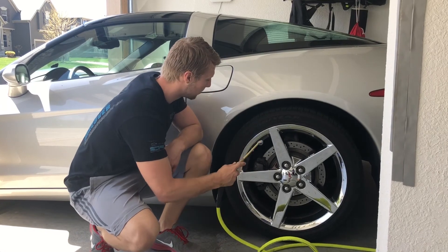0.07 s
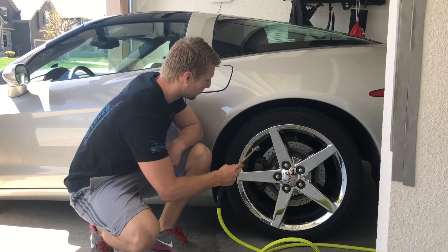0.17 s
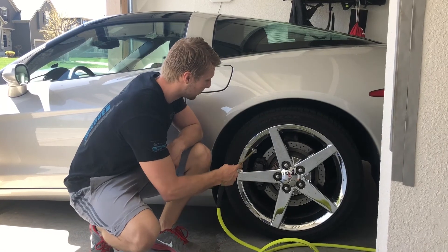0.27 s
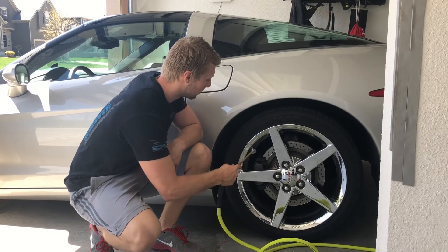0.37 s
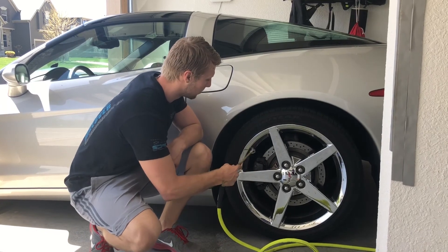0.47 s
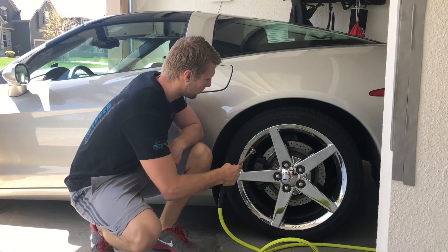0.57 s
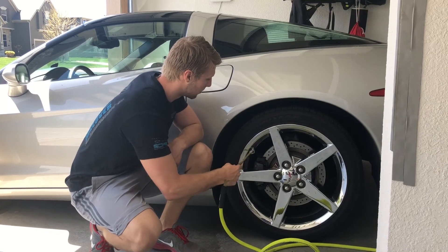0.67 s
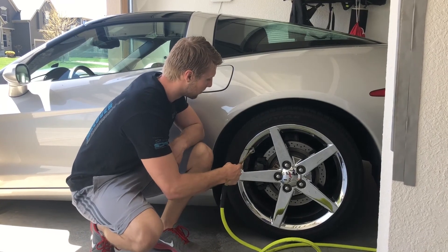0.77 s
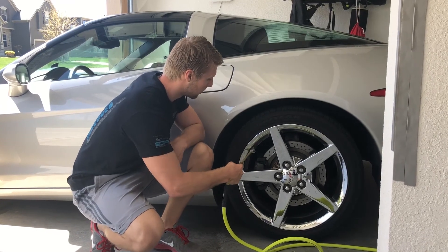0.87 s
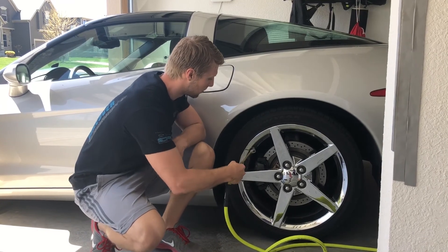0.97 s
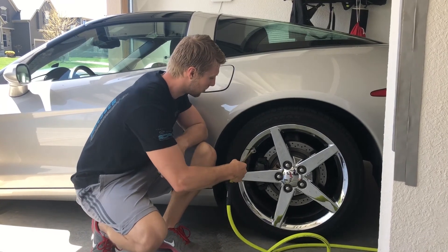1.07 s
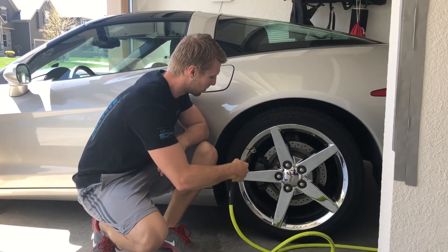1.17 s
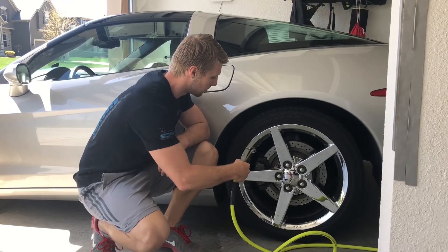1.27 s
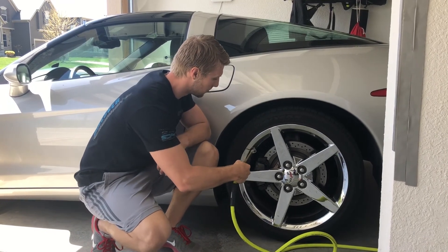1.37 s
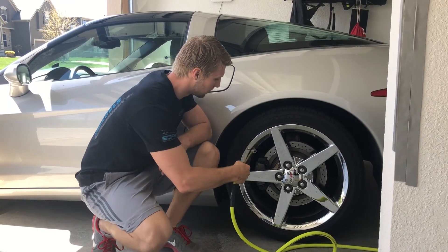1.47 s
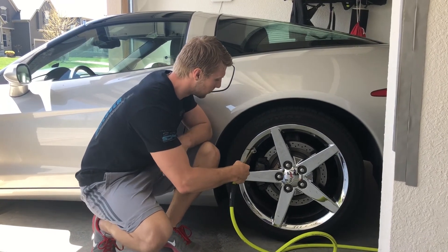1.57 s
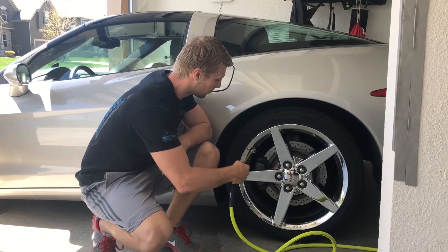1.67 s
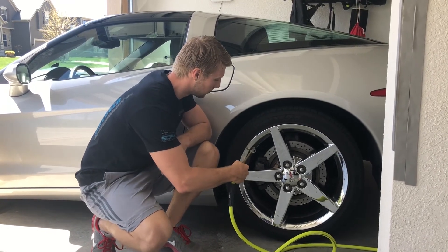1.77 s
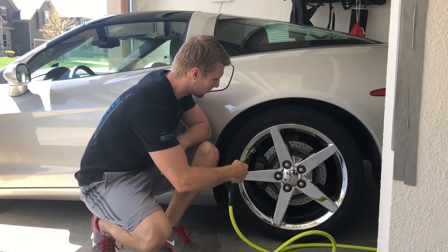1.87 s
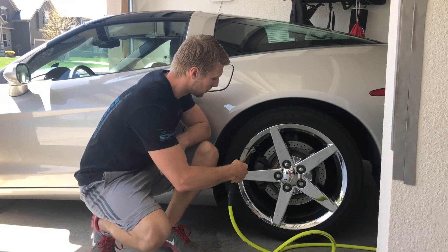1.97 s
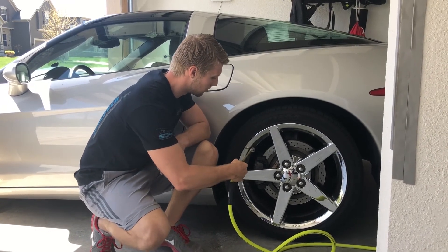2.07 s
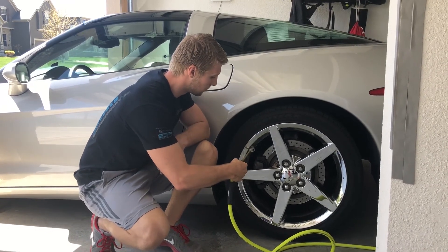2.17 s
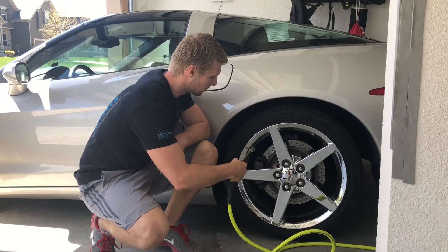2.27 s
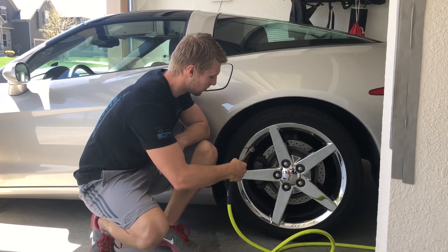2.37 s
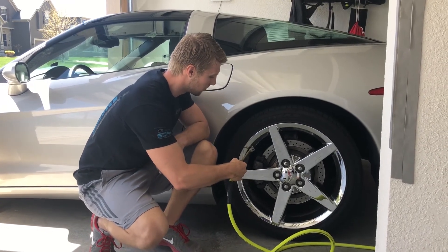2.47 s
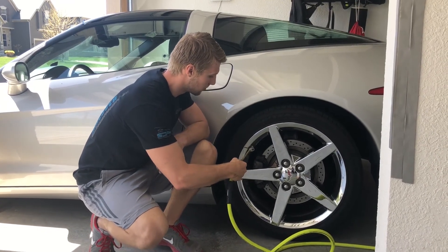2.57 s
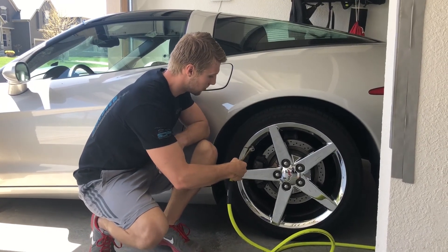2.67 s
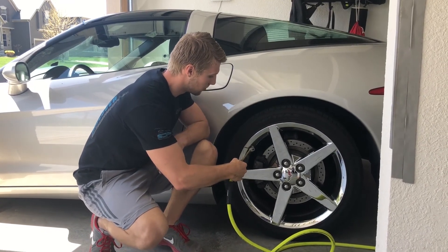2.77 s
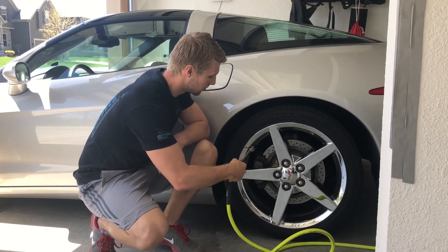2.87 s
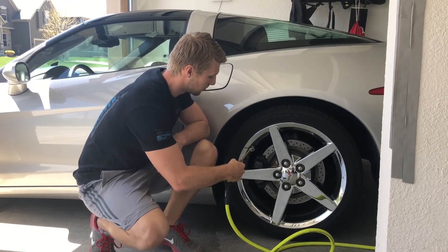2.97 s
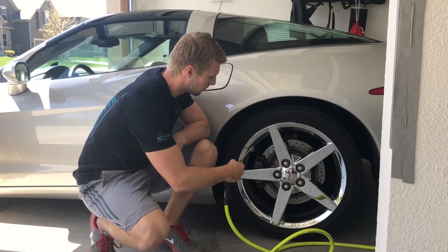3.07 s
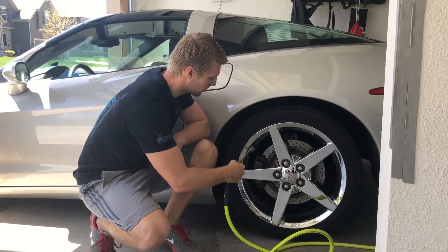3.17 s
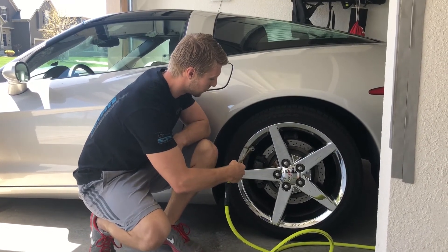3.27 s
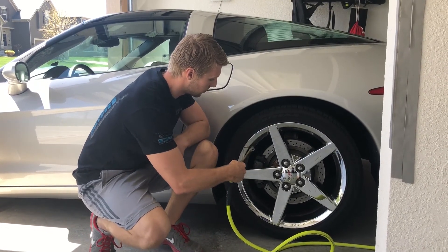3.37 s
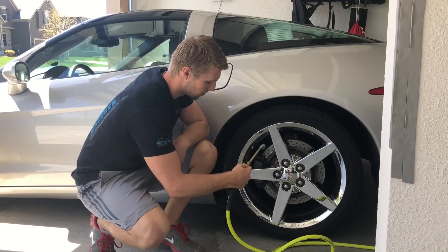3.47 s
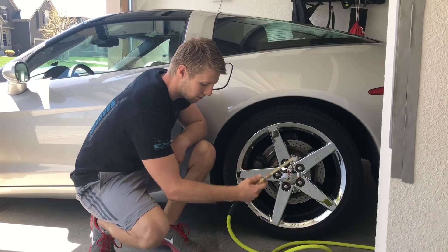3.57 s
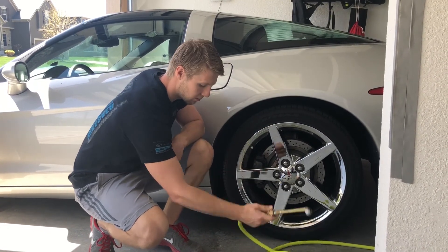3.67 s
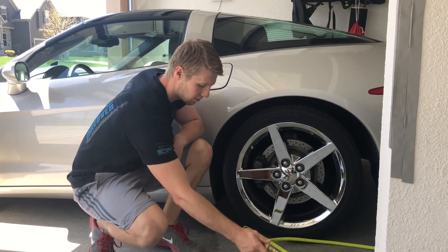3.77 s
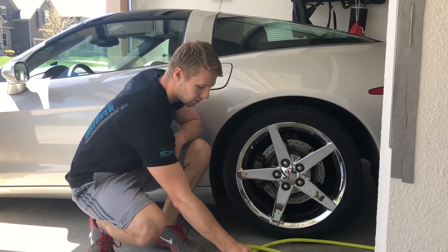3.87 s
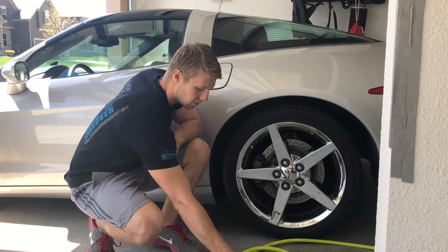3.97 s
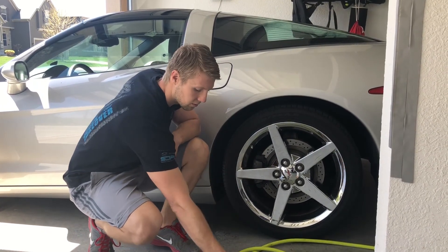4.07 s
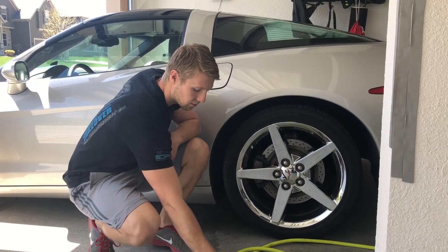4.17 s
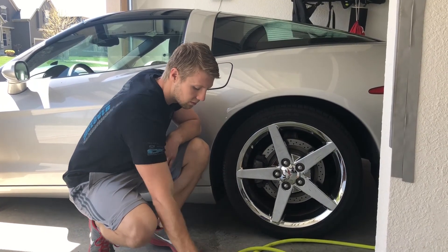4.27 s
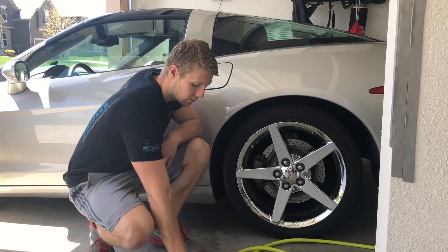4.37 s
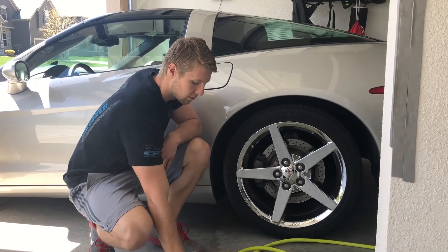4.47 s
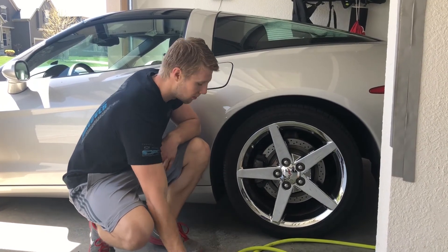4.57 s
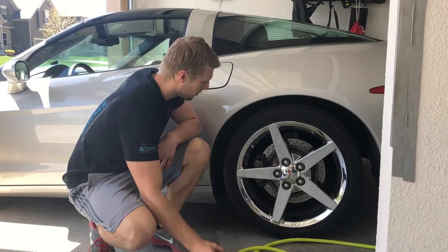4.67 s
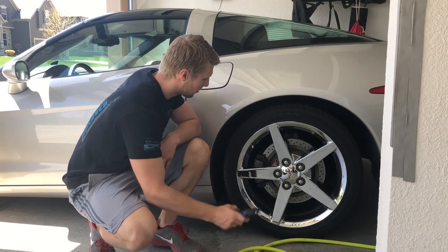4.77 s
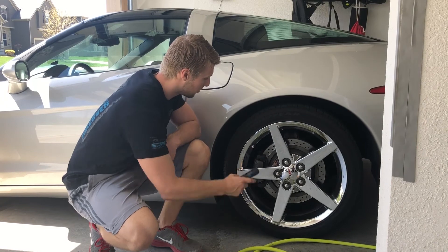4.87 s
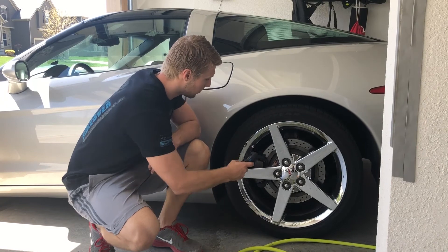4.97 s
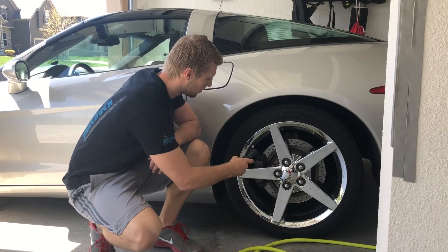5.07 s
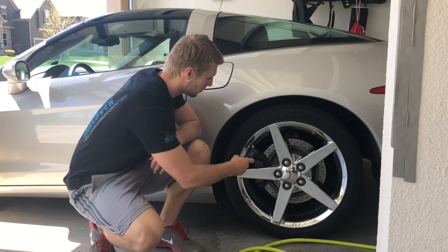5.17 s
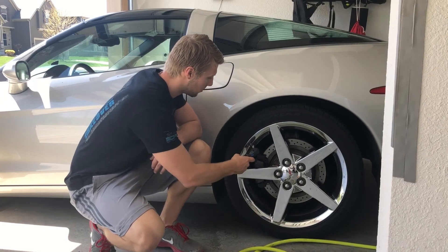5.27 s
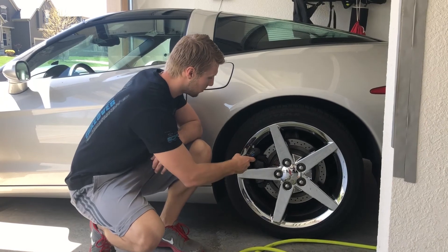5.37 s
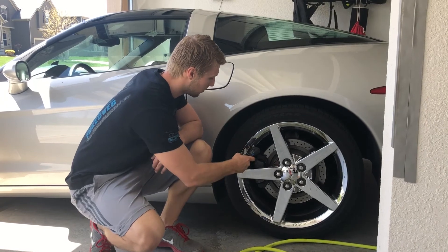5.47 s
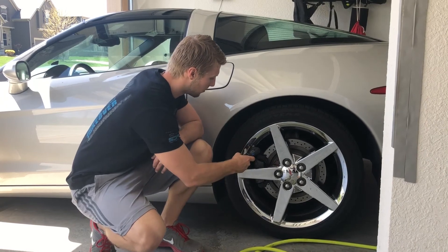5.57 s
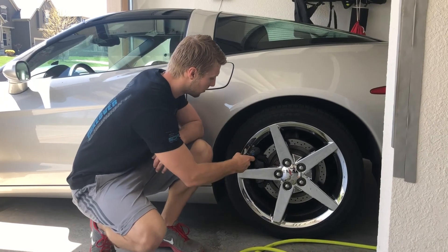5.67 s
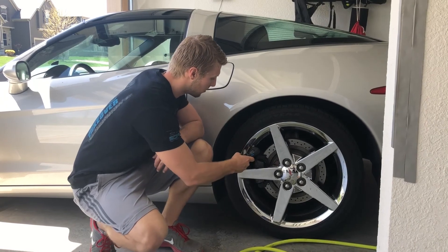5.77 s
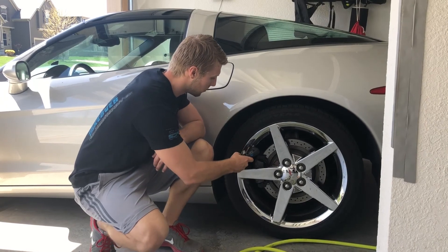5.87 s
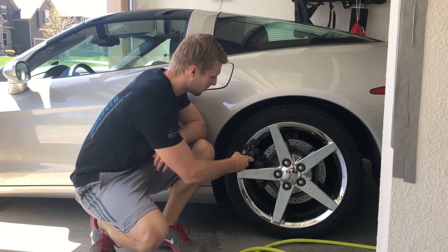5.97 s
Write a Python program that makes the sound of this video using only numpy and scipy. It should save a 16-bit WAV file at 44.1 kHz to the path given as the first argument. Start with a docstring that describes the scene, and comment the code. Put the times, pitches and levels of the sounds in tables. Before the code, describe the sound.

A quiet open garage with low mains hum, soft fan drone and outdoor air, heard in mono from a few steps away. After a faint scuff, a chuck knocks sharply on a tyre valve at 0.3 s, with weaker taps to 0.9 s; some give tiny falling chirps and lingering wheel ring. At 0.94 s a very short, loud double spit of air rings inside the tyre. A thin, bright, slightly singing hiss opens by 1.4 s, settles and wavers until 3.0 s, with light cloth rubs and a faint squeak near 2.1 s. Faint insect buzz swells around 3.2-3.8 s. A brief hiss at 3.3 s precedes a strong spurt at 3.42 s. Light floor contacts at 4.0 s lead to a hard, rebounding metal clack on concrete at 4.25 s. Plastic gauge clicks come at 4.5-4.9 s, then small clicks and a rub near 5.55 s and a weak puff at 5.76 s.

```python
"""An air chuck tops up a car tyre in an open garage: it taps onto the valve, spits as it seats, hisses thinly while
air flows and spits again as it comes off. It is dropped on the concrete; a gauge is picked up and pressed on.
Hits are coloured noise bursts and air is shaped noise; blows on the valve add falling chirps and wheel ringing.
Soles and cloth rub, with a faint squeak, a mains hum, a fan and one burst of insects under the garage's echo."""
import sys
import numpy as np
from scipy import signal
from scipy.fft import rfft, irfft
from scipy.io import wavfile

SR = 44100
rng = np.random.default_rng(int(sys.argv[2]) if len(sys.argv) > 2 else 0)


def persist_wave(psi):
    """Save psi, clipped to +-1, as 16-bit WAV."""
    counts = np.round(np.clip(psi, -1, 1) * 32767).astype(np.int16)
    wavfile.write(sys.argv[1], SR, np.atleast_2d(counts).T)


N = 265570
TIME = np.arange(N) / SR
FREQS = np.fft.rfftfreq(8192, 1 / SR) + 1  # the 1 Hz offset keeps logs and divisions finite

# Chuck against the valve. Each row: start in seconds, click level in dB, brightness in dB per octave,
# wheel chirp level in dB.
VALVE_TAPS = [(0.2931, -29, -1.73, -37.5), (0.4103, -55, 12.5, -38), (0.574, -45, -5.5, -50),
              (0.713, -63, 0.5, -57), (0.7967, -42, -1, -56.5), (0.918, -56, 5, -51), (0.934, -64, -5, -43),
              (1.225, -55.5, 5.5, -83)]


def undb(db):
    """Decibels to gain."""
    return 10 ** (np.asarray(db) / 20)


def unit(x):
    """Scale to rms 1."""
    return x / np.sqrt(np.mean(x ** 2))


def noise():
    """White noise over the whole scene."""
    return rng.standard_normal(N)


def walk(rate):
    """Slow random drift with a spread near 1, through 'rate' random points a second."""
    knots = rng.standard_normal(4000)
    return np.interp(TIME * rate, np.arange(len(knots)), knots)


def colour(points, tilt_db=0):
    """Gain over frequency from (Hz, dB) points, tilted per octave."""
    hz, db = np.transpose(points)
    level_db = np.interp(np.log(FREQS), np.log(hz), db)
    return undb(level_db + tilt_db * np.log2(FREQS))


def resonances(modes):
    """Gain over frequency of a set of (Hz, width in Hz, dB) peaks, summed in power."""
    power = 0
    for hz, width, db in modes:
        detuning = (FREQS - hz ** 2 / FREQS) / width
        power = power + undb(db) ** 2 / (1 + detuning ** 2)
    return np.sqrt(power)


def through(x, response):
    """Convolve, keeping the length."""
    return signal.fftconvolve(x, response)[:len(x)]


def shape(x, gain):
    """Causal minimum-phase filter with the given relative gain curve; white noise keeps its power."""
    cepstrum = irfft(np.log(gain / gain.max() + 1e-5))
    half = len(cepstrum) // 2
    folded = np.r_[cepstrum[0], 2 * cepstrum[1:half]]
    response = irfft(np.exp(rfft(folded, 2 * half)))
    return through(x, response / np.linalg.norm(response))


def add(track, s, sound):
    """Mix a sound in from time s."""
    i = max(int(s * SR), 0)
    track[i:i + len(sound)] += sound[:N - i]


def swell(s, rise, hold, fall):
    """An envelope that opens up to time s, holds, and dies away; rise and fall are time constants."""
    opening = np.minimum(TIME - s, 0) / rise
    closing = np.maximum(TIME - s - hold, 0) / fall
    return np.exp(opening - closing)


def tail(t60, build):
    """A second of dense echoes that build up and decay; energy 1."""
    t = TIME[:SR]
    echoes = rng.standard_normal(SR) * undb(-60 * t / t60) * (1 - np.exp(-t / build))
    return echoes / np.linalg.norm(echoes)


def clicks(rows, body, chatter_s, wet_db):
    """Hard contacts: a few milliseconds of chatter and its echo, coloured by the struck body."""
    out, t = np.zeros(N), TIME[:SR]
    for s, db, tilt_db, *_ in rows:
        chatter = rng.standard_normal(SR) * np.exp(-t / chatter_s)
        echo = undb(wet_db) * np.linalg.norm(chatter) * garage_tail()
        add(out, s, undb(db) * shape(chatter + echo, colour(body, tilt_db)))
    return out


def flow(waver_db=-2.4, open_s=0.08, close_s=.06, surge_db=4, surge_s=0.46):
    """Air stream: the valve opens gradually, stored hose pressure surges, settles, wavers and is shut off."""
    # Shots of air into the tyre. Each row: fully open time in seconds, length in seconds,
    # settled level in dB ahead of the jet and ring mix.
    shots = [(1.388, 1.637, -61.5), (3.288, 0.05, -66)]
    strength = 0
    for s, length, db in shots:
        surge = surge_db * np.exp(-np.maximum(TIME - s, 0) / surge_s)
        strength = strength + undb(db + surge) * swell(s, open_s, length, close_s)
    return strength * undb(waver_db * walk(12))


def tube():
    """Gain over frequency of the chuck's straight stem, a pipe with evenly spaced resonances."""
    spacing_hz, reflection = 700, .42
    return 1 / np.abs(1 - reflection * np.exp(2j * np.pi * FREQS / spacing_hz))


def filling(ring_db=-7, jet_db=-2):
    """The steady jet in the valve is combed by the stem and sings in the narrow metal bores."""
    # Spectrum of the jet. Each row: frequency in Hz, relative level in dB.
    jet_spectrum = [(2500, -16), (3800, -7), (6000, -7.5), (6750, 1), (8000, -10), (9200, 0), (11500, 2),
                    (13500, -1), (15000, -22.5), (15800, -4)]
    # Sharp resonances of the valve. Each row: frequency in Hz, width in Hz, relative level in dB.
    valve_modes = [(6690, 130, -6), (9080, 50, -6), (11200, 60, 0), (11950, 90, -1), (12630, 45, -2),
                   (13530, 45, -2)]
    jet = shape(noise(), colour(jet_spectrum) * tube())
    ring = shape(noise(), resonances(valve_modes))
    return (undb(jet_db) * jet + undb(ring_db) * ring) * flow()


def spits(rough_db=-3.5, fall_share=0.64, sag_s=0.063, into_tyre_db=-14.5, ring_t60=0.67, ring_db=-3):
    """Short jets past the rubber seal sag with the pressure; the part shot into the tyre rings on in there."""
    # Air escaping past the seal. Each row: start of the hold in seconds, level in dB, rise in seconds,
    # length in seconds, brightness in dB per octave.
    jets = [(0.9371, -27, 0.0012, 0.0075, 0.5), (0.9446, -21.5, 0.001, 0.0021, 2.5),
            (3.4171, -26, 0.002, 0.027, 1.24), (5.762, -43, 0.0087, 0.005, -1)]
    # Spectrum of the jets. Each row: frequency in Hz, relative level in dB.
    spit_spectrum = [(130, -5), (300, -4.5), (550, -18.5), (1000, -12), (2000, -13.5), (3000, -9.5),
                     (4000, -7.5), (5500, -4.5), (7500, -0.5), (9500, -3.5), (11500, -6), (15800, -7)]
    # High resonances of the air inside the tyre. Each row: frequency in Hz, width in Hz, relative level in dB.
    tyre_modes = [(3830, 200, -19), (4520, 174, 5), (4890, 170, 10), (5840, 350, 0), (6780, 340, 0.5),
                  (7550, 76, 10), (9160, 250, -1)]
    outside, inside = 0, np.zeros(N)
    for s, db, rise, length, tilt_db in jets:
        pressure = np.exp(-np.maximum(TIME - s, 0) / sag_s)
        rough = noise() * undb(db + rough_db * walk(400))
        jet = rough * swell(s, rise, length, fall_share * length) * pressure
        outside = outside + shape(jet, colour(spit_spectrum, tilt_db))
        add(inside, s, undb(into_tyre_db) * np.linalg.norm(jet) * tail(ring_t60, 0.0035))
    return garage(outside, wet_db=-7) + undb(ring_db) * shape(inside, resonances(tyre_modes))


def valve_clicks():
    """The chuck knocks on the valve in short bursts of chatter."""
    # Spectrum of a knock. Each row: frequency in Hz, relative level in dB.
    tap_spectrum = [(130, -23.5), (320, 0.5), (500, -20), (800, -3), (1400, -10), (2000, -2), (2900, -7.5),
                    (4100, -5), (5200, -15), (8000, -13.5), (10500, -26), (15800, -43)]
    return clicks(VALVE_TAPS, tap_spectrum, chatter_s=0.0051, wet_db=-6.5)


def wheel_chirps(start_hz=2400, end_hz=1040, glide_s=0.00262, ring_db=-1, ring_t60=0.63, scatter_db=-4):
    """Highs run round the wheel faster than lows: taps fall in pitch, scatter, then linger in the lowest notes."""
    # Lowest ringing notes of the wheel. Each row: frequency in Hz, width in Hz, relative level in dB.
    wheel_modes = [(1003, 23, -3.5), (1104, 19, 0.5), (1416, 89, -9.5)]
    out, t = np.zeros(N), TIME[:SR]
    rise_s = .004
    hz = end_hz + (start_hz - end_hz) * np.exp(-t / glide_s)
    envelope = t / rise_s * np.exp(1 - t / rise_s)
    chirp = np.sin(2 * np.pi * np.cumsum(hz) / SR) * envelope
    for s, _, _, db in VALVE_TAPS:
        scattered = undb(scatter_db) * through(chirp, tail(0.16, 0.00076))
        ringing = shape(tail(ring_t60, 0.0094), resonances(wheel_modes))
        ring = undb(ring_db) * np.linalg.norm(chirp) * ringing
        add(out, s, undb(db) * (chirp + scattered + ring))
    return out


def bounces(count=4, gap_s=.0042, loss_db=4, dull_db=1):
    """Contacts with the concrete as (s, dB, brightness): each hit and its quick, weaker, duller rebounds."""
    # Chuck and hose coupling on the concrete. Each row: start in seconds, click level in dB,
    # brightness in dB per octave.
    floor_hits = [(3.958, -53, 0.5), (4.060, -59.5, 4), (4.247, -45, -0.5), (4.2564, -26, 1.5)]
    return [(s + k * gap_s, db - k * loss_db, tilt_db - k * dull_db)
            for s, db, tilt_db in floor_hits for k in range(count)]


def floor_clicks():
    """The dropped chuck and coupling strike and rebound as short bursts of chatter."""
    # Spectrum of a hit. Each row: frequency in Hz, relative level in dB.
    floor_spectrum = [(100, -7), (190, 7.5), (300, 5), (430, 4.5), (750, -2.5), (1050, -3.5), (1900, -4),
                      (4000, -5.5), (5600, -10), (7000, -7), (9200, -4.5), (10500, -14), (13300, -13),
                      (15800, -15.5)]
    return clicks(bounces(), floor_spectrum, chatter_s=0.0017, wet_db=-5)


def chuck_ring(ring_db=-23.0):
    """Every blow on the concrete sets the chuck ringing, each time in a slightly different mix."""
    # Ringing of the dropped chuck and its hose. Each row: frequency in Hz, relative level in dB,
    # time to fall by 60 dB in seconds.
    chuck_modes = [(416, -4, 0.53), (1176, -12, 0.53), (3060, -14, 0.25), (6770, -7.5, 0.31),
                   (8732, -24, 0.23), (8909, -18, 0.13), (13100, -14.5, 0.21)]
    out, t = np.zeros(N), TIME[:SR]
    for s, hit_db, _ in bounces():
        for hz, db, t60 in chuck_modes:
            decay = np.exp(-np.log(1000) * t / t60)
            mode = np.sin(2 * np.pi * (hz * t + rng.random())) * decay
            add(out, s, undb(hit_db + ring_db + db + rng.standard_normal()) * mode)
    return out


def gauge_clicks():
    """The plastic gauge clicks in short bursts of chatter as it is handled."""
    # Contacts of the gauge. Each row: start in seconds, click level in dB, brightness in dB per octave.
    contacts = [(4.539, -53, 3), (4.575, -57, 5), (4.631, -33.5, -0.5), (4.635, -38, 1.5), (4.678, -49, 17),
                (4.914, -53, 4.5), (5.5366, -51, 1.5), (5.548, -45.5, -5), (5.6015, -52, -2.5)]
    # Spectrum of a click. Each row: frequency in Hz, relative level in dB.
    gauge_spectrum = [(400, -31.5), (900, -14), (1250, 0.5), (2000, -2.5), (2900, -0.5), (4000, -2.5),
                      (5600, -8.5), (8000, -8.5), (11000, -14), (15800, -29)]
    return clicks(contacts, gauge_spectrum, chatter_s=0.0019, wet_db=-5.5)


def scuffs(grain_db=4, rise_share=0.31, fall_share=1.3):
    """Soles and cloth rub in small uneven slips, building and fading in shares of their length."""
    # Shoes and clothes. Each row: start of the hold in seconds, level in dB, length in seconds.
    rubs = [(.01, -59.5, 0.075), (2.373, -66, 0.034), (2.474, -57, 0.0083), (2.797, -59, 0.045),
            (5.535, -53, 0.0099)]
    rubbing = 0
    for s, db, length in rubs:
        rubbing = rubbing + undb(db) * swell(s, rise_share * length, length, fall_share * length)
    grains = unit(noise() * undb(grain_db * walk(150)))
    rub_spectrum = [(150, 4.5), (430, 5.5), (700, -0.5), (1150, 1.5), (2000, -3.0), (4500, -8.5),
                    (8000, -23.5), (15000, -33)]  # Hz, relative dB
    return shape(rubbing * grains, colour(rub_spectrum))


def garage_tail(build_s=0.002):
    """The diffuse echo of the garage, noise whose treble dies first; energy 1."""
    # The garage's decay. Each row: frequency in Hz, time to fall by 60 dB in seconds.
    decay_times = [(200, 0.89), (600, 0.79), (1400, 0.81), (3700, 0.63), (7000, 0.45), (10000, 0.3),
                   (15000, 0.26)]
    hz, t, bins = signal.stft(rng.standard_normal(SR), SR, nperseg=256)
    t60 = np.interp(hz, *np.transpose(decay_times))[:, None]
    decaying = bins * undb(-60 * t / t60) * (1 - np.exp(-t / build_s))
    diffuse = signal.istft(decaying, SR)[1][:SR]
    return diffuse / np.linalg.norm(diffuse)


def garage(x, wet_db):
    """A few near reflections, then the diffuse echo."""
    # Reflections off car body, floor and wall. Each row: delay in seconds,
    # gain relative to the direct sound.
    reflections = [(.0028, 0.19), (.0062, 0.085), (0.011, 0.31)]
    near = np.zeros(SR)
    near[0] = 1
    for delay, gain in reflections:
        near[int(delay * SR)] += gain
    return through(x, near / np.linalg.norm(near) + undb(wet_db) * garage_tail())


def far_squeak(s=2.095, hz=1780, db=-73):
    """A faint, brief squeak from somewhere outside: a narrow band of noise."""
    squeak = shape(noise(), resonances([(hz, 220, 0)]) ** 2)
    return undb(db) * swell(s, .02, 0.051, 0.076) * squeak


def insects(s=3.18, db=-68, rise_s=.1, hold_s=0.63, fall_s=0.35):
    """One burst of insect buzz outside: noise in broad bands with a rapid flutter."""
    # Bands of the buzz. Each row, ahead of the squaring: frequency in Hz, width in Hz, relative level in dB.
    buzz_bands = [(2620, 700, -1), (5200, 1000, 0)]
    burst = undb(db) * swell(s, rise_s, hold_s, fall_s)
    return shape(noise(), resonances(buzz_bands) ** 2) * burst * undb(0.78 * walk(38))


def fan(drone_db=-63):
    """Broad drones of a fan and a thin steady hiss: noise through squared resonances."""
    # Drones and hiss. Each row, ahead of the squaring: frequency in Hz, width in Hz, relative level in dB.
    drones = [(91, 72, -2), (216.6, 15.8, 2.5), (304.8, 86, -0.5), (5900, 250, -12)]
    peaks = resonances(drones)
    return shape(noise(), peaks ** 2 / peaks.max()) * undb(drone_db)


def mains_hum(hz=120.7, db=-61.5):
    """A steady sine hum whose level drifts slightly."""
    return np.sqrt(2) * np.sin(2 * np.pi * hz * TIME) * undb(db + .5 * walk(3))


def outdoor_air(db=-64):
    """Coloured noise of the open air, drifting slowly in level."""
    # Spectrum of the air. Each row: frequency in Hz, relative level in dB.
    air_spectrum = [(20, -26), (35, -11), (52, -5.5), (100, -2), (165, -7), (300, -7), (400, -9.5),
                    (470, -13.5), (830, -16.5), (1590, -23.5), (2730, -26), (4500, -28.5), (7000, -31.5),
                    (11100, -33.5), (15800, -37)]
    return shape(noise(), colour(air_spectrum)) * undb(db + 0.32 * walk(0.83))


def scene():
    """Everything at the wheel and on the floor, over the background."""
    air = spits() + garage(filling(), wet_db=-7.5)
    taps = valve_clicks() + wheel_chirps()
    drop = floor_clicks() + chuck_ring()
    handling = gauge_clicks() + garage(scuffs(), wet_db=-8.0)
    background = far_squeak() + insects() + fan() + mains_hum() + outdoor_air()
    return (air + taps + drop + handling + background)[None]


def record(dry):
    """The microphone sheds the deepest bass and the recorder cuts the top."""
    bass_hz, top_hz = 36, 15900
    lean = signal.sosfilt(signal.butter(4, bass_hz, "high", fs=SR, output="sos"), dry)
    return signal.sosfilt(signal.ellip(10, .2, 70, top_hz, fs=SR, output="sos"), lean)


dry = scene()
out = record(dry)
persist_wave(out)
```